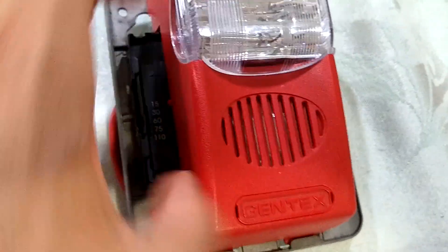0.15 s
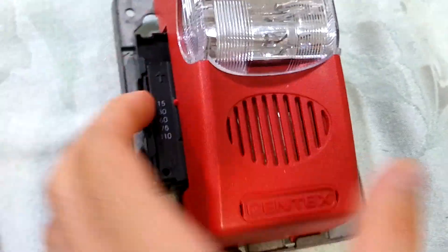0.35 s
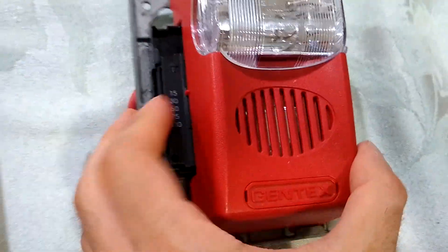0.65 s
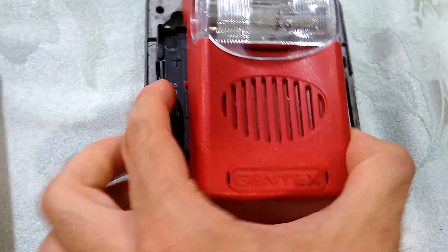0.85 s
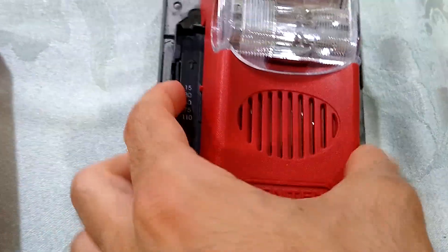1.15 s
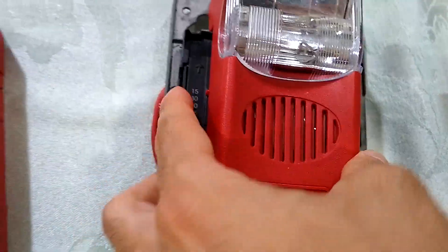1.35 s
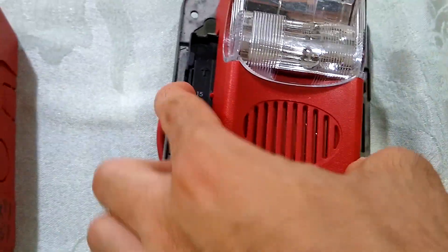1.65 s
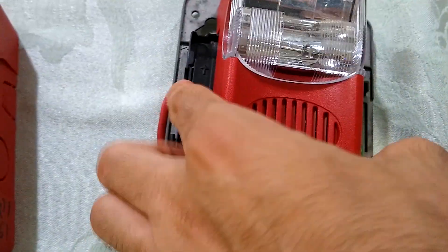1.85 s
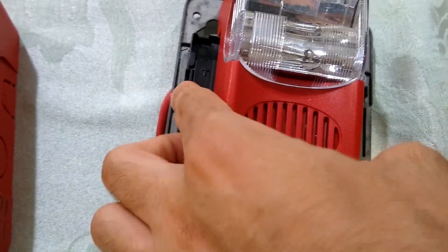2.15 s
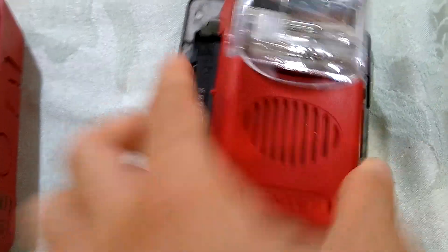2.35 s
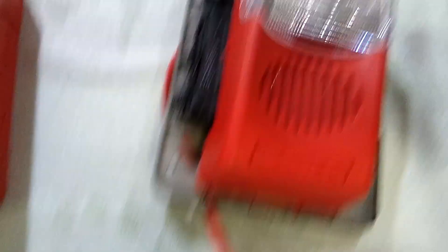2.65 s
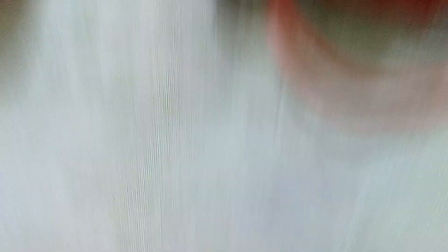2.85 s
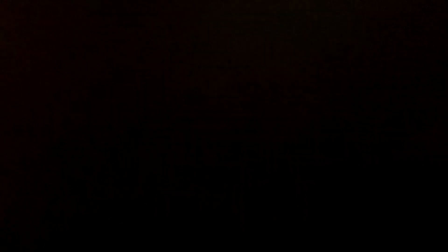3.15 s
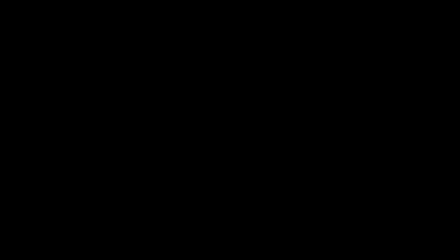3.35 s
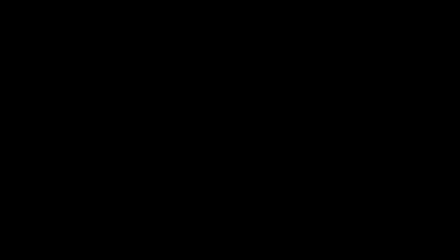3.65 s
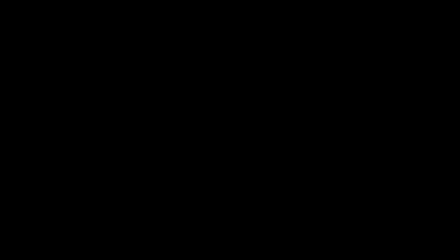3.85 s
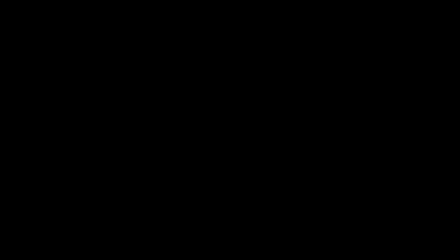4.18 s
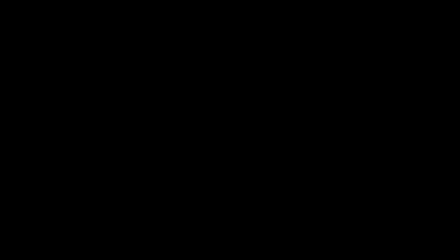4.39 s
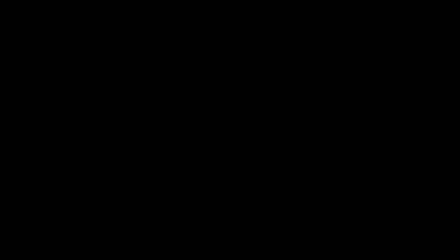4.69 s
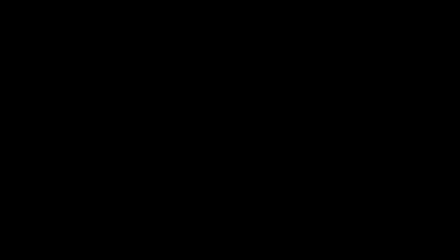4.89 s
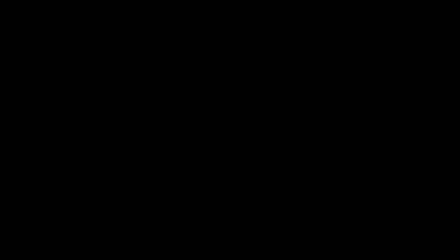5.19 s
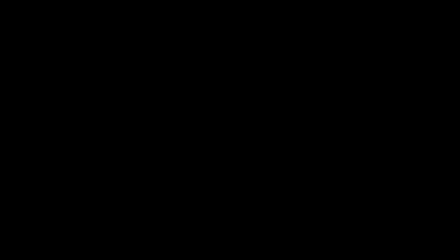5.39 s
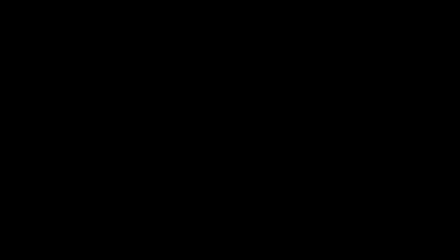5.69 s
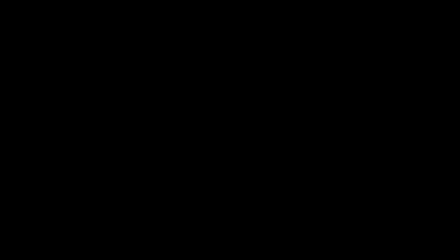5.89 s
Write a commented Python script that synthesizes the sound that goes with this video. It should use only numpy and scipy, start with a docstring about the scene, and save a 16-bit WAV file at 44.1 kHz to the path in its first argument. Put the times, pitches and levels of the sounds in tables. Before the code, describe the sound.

Small plastic clicks and scrapes, then close microphone handling thumps and two loud knocks on a table, with faint clicking continuing.

```python
"""At a table, a hand squeezes and slides a plastic part on a small alarm housing. Catches snap and
surfaces scrape, making the hollow plastic ring. The hand then takes hold of the recorder, whose shell
thumps and rumbles, and lays it on the table with two knocks; the clicking goes on beside it.
A motor hums faintly over the room noise, louder while the recorder's edge presses on the table."""
import sys
import numpy as np
from scipy import signal
from scipy.fft import rfft, irfft, next_fast_len
from scipy.io import wavfile

SR = 44100
rng = np.random.default_rng(int(sys.argv[2]) if len(sys.argv) > 2 else 0)


def dump_mix(stems):
    """Bounce the given channels to the path in sys.argv[1] as a 16-bit WAV at rate SR."""
    frames = np.atleast_2d(stems).T  # one column per channel
    limited = np.clip(frames, -1, 1)  # hard clip at full scale
    pcm = np.round(limited * 32767).astype(np.int16)
    wavfile.write(sys.argv[1], SR, pcm)


N = 265834
TIME = np.arange(N) / SR
TURNED_OVER_S, ON_TABLE_S = 2.7, 3.59   # the recorder is turned over, and later lies still
PRESS_FROM_S, PRESS_TO_S = 3.26, 3.37   # its edge presses on the table

# Plastic catches snapping. Each row: time in seconds, level of the ring range in dB,
# then the edge range (before a small trim) and the treble range in dB against the ring.
CLICKS = [(0.0145, -61, -17, -32), (0.053, -53.5, -17.5, -23.5), (0.5312, -60, -22, -32),
          (0.6346, -66, -22, -25), (0.8304, -54, -26, -25), (0.8573, -60, -15, -28),
          (0.9235, -57, -13, -11.5), (1.133, -47, -12, -15.5), (1.1708, -51.5, -23, -39),
          (1.2904, -54.5, -21, -21), (1.8148, -56, -22, -36), (1.9408, -48, -15.5, -19.5),
          (1.9844, -38.5, -22, -23.5), (2.3064, -52.5, -23, -25), (2.4785, -30.5, -28, -32),
          (2.495, -33.5, -19, -27), (2.8142, -41, -5.5, -13.5), (2.8532, -40, 1.5, 2), (2.9294, -62, 5, -4),
          (3.0668, -62.5, 10, -0.5), (3.7435, -52.5, -14, -26), (3.8212, -48.5, 0, -19),
          (3.8812, -39.5, -12.5, -45), (4.0555, -51, -27, -44), (4.176, -56.5, -8, -13.5),
          (4.634, -27.5, -8, -16), (4.643, -46, -10, -28.5), (4.4834, -58, -10.5, -25),
          (4.7637, -59, -11.5, -24), (4.8425, -60.5, -11, -11.5), (5.264, -64.5, -18, -24),
          (5.4137, -48, -1, -7.5), (5.673, -58.5, -11.5, -15), (5.8354, -55.5, -17.5, -22.5),
          (6.0005, -41, -23, -37), (6.0215, -39.5, 0, -9)]
# Plastic sliding. Each row: time of hardest pressure in seconds, length in seconds, level in dB,
# extra brightness in dB.
SCRAPES = [(0.218, 0.086, -59, -0.5), (0.92, 0.091, -63.5, 2.5), (1.32, 0.036, -55.5, -0.5),
           (1.983, 0.03, -41.5, -0.5), (2.413, 0.074, -49, 1.5), (2.501, 0.05, -38.5, 1.5),
           (2.812, 0.049, -49, 10), (2.841, 0.033, -47.5, 19), (3.232, .022, -48, 12.5),
           (3.321, 0.14, -59, 9), (3.372, 0.043, -40, 7.5), (3.402, .03, -46.5, 24),
           (3.758, 0.048, -53.5, -1.5), (3.881, 0.016, -47, -23), (4.058, 0.099, -61.5, -17),
           (4.986, .05, -60, 6.5), (5.138, 0.075, -64.5, -0.5), (5.58, 0.085, -61.5, 1.5),
           (6.02, 0.074, -44, -3)]
# Spells of restless fingers. Each row: start in seconds, end in seconds, base level in dB.
FIDGETS = [(0.797, 1.306, -67), (3.947, 4.582, -68.5), (4.65, 5.95, -77)]
# The tones the housing rings at. Each row: pitch in Hz, width in Hz, level in dB while it is
# left of the recorder, level in dB while it is on the right.
HOUSING_TONES = [(268, 89, -10.5, 5), (505, 110, -19, -0.5), (596, 100, -0.5, 0.5), (752, 88, 2.5, -1.5),
                 (860, 84, 5, -2.5), (1030, 150, 2, 2), (1190, 150, 0.5, 3), (1450, 280, -6, -1.5),
                 (1920, 520, -12.5, -11.5), (2984, 420, -12, -9.5), (3670, 860, -19.5, -16.5),
                 (5680, 1500, -14, -12), (8000, 3540, -30, -19), (9660, 1400, -24, -27.5),
                 (11640, 1100, -33, -29.5), (14200, 730, -19, -19.5)]
# The housing's sound has four ranges, low to high: body, ring, edge, treble. Their borders in Hz.
RANGE_BORDERS_HZ = [550, 1900, 4600]
# The recorder hitting the table. Each row: time in seconds, base level in dB,
# hardness in Hz (higher is brighter), seconds by which the rim touches first.
LANDINGS = [(3.2404, -3.5, 968, .0085), (3.4164, -5.5, 494, 0.00447)]
# Fingers bumping the recorder. Each row: time in seconds, base level in dB, hardness in Hz.
KNOCKS = [(0.111, -30.5, 123), (0.354, -38, 150), (1.104, -31.5, 188), (1.137, -34, 217), (1.988, -31, 346),
          (2.315, -17, 110), (2.3323, -24, 520), (2.35, -18, 258), (2.381, -20.5, 259), (2.404, -8, 240),
          (2.459, -15.5, 127), (2.476, -15.5, 386), (2.595, -17.5, 242), (2.709, -28, 332),
          (2.78, -26.5, 520), (2.794, -15.5, 263), (2.805, -15, 239), (2.854, -23, 500), (2.931, -30, 464),
          (3.368, -15.5, 130), (3.743, -28.5, 506), (4.64, -26, 288), (6.005, -36.5, 347)]
# Skin dragging on the recorder. Each row: time of hardest pressure in seconds, length in seconds,
# level in dB.
DRAGS = [(0.651, 0.12, -50.5), (1.141, .08, -39), (2.349, 0.046, -31.5), (2.482, 0.14, -29),
         (2.794, 0.063, -22), (3.451, 0.014, -36), (3.512, 0.13, -47.5), (4.088, .09, -52.5),
         (4.491, 0.065, -49.5)]
# The tones of the recorder's shell. Each row: base pitch in Hz, base width in Hz, level in dB.
SHELL_TONES = [(83, 34, 16.5), (150, 23.3, 3), (277.8, 29, -25.5), (486, 210, -17.5), (895, 680, -12)]
# The room's steady noise. Each row: frequency in Hz, relative level in dB.
ROOM_NOISE = [(30, -29), (60, 3.5), (100, 7.5), (250, -1.5), (400, -16.5), (700, -19), (1200, -23),
              (2000, -30), (3100, -34), (4400, -42), (12000, -49)]
# What the table top adds to that noise. Each row: frequency in Hz, relative level in dB.
TABLE_NOISE = [(100, -14), (250, 2), (450, -6.5), (800, -21), (1300, -31), (2000, -18.5), (5500, -35.5),
               (9000, -49)]
# Faint steady hiss, separate in each channel, falling away steeply above 12 kHz.
# Each row: frequency in Hz, relative level in dB.
FAINT_HISS = [(500, 1), (3000, 1), (4400, 0), (12300, -3), (13500, -20), (15000, -30)]
# Treble dips of the ports (the microphone openings). Each row: frequency in Hz, narrowness as Q.
PORT_DIPS = [(4400, 28), (6700, 26)]


def clicks(edge_trim_db=-1.5):
    """The sliding part and its catches snap."""
    out = np.zeros((2, N))
    for s, db, edge_db, treble_db in CLICKS:
        add(out, *click(s, db, edge_db + edge_trim_db, treble_db))
    return out


def click(s, db, edge_db, treble_db, body_db=-12.0, creep_s=0.0024, chatter_s=0.0065):
    """A catch creeps, lets go in one sharp step, then chatters. Returns start and sound."""
    lead = SR // 200
    t = TIME[:SR // 10] - lead / SR
    contact = np.exp(-np.abs(np.where(t < 0, t / creep_s, t / chatter_s)))
    # the brightest, hardest snaps chatter least
    chatter_db = -20 - 0.29 * (treble_db + 19) - 0.22 * max(db + 60.5, 0)
    force = from_db(chatter_db) * rng.standard_normal(len(t)) * contact
    force[lead] += 1   # the catch lets go
    gains = from_db([body_db, 0, edge_db, treble_db])
    sound = sum(gain * unit_energy(part) for gain, part in zip(gains, housing(force, s)))
    return s + t[0], from_db(db) * place(sound, s)


def scrapes():
    """Plastic and fingers slide on the housing and set it ringing."""
    out = np.zeros((2, N))
    for s, length, db, bright_db in SCRAPES:
        t, pressure, force = slips(length, per_s=2200, spread_db=4.5)
        add(out, s + t[0], from_db(db) * place(pressure * rub(force, s, bright_db), s))
    return out


def fidgets(unsteady_db=4.5, unsteady_hz=12.4, ticks_per_s=5):
    """Restless fingers rub the housing with unsteady pressure and make it tick now and then."""
    out = np.zeros((2, N))
    for start, end, db in FIDGETS:
        force = grains(int((end - start) * SR), per_s=1400, spread_db=4.0)
        wobble = rms_one(cut(rng.standard_normal(len(force)), unsteady_hz, "low"))
        pressure = signal.windows.tukey(len(force), .4) * from_db(unsteady_db * wobble)
        add(out, start, from_db(db) * place(pressure * rub(force, start, bright_db=-6.0), start))
        for s in rng.uniform(start, end, int(ticks_per_s * (end - start))):
            tick_db = db + 8.5 + 3.5 * rng.standard_normal()
            add(out, *click(s, tick_db, edge_db=-28.0, treble_db=-34.0))
    return out


def rub(force, s, bright_db, body_db=-5.5, edge_db=-6.0, treble_db=-11.5):
    """The housing rings under a run of tiny slips, spread over many contact points."""
    ranges = housing(force, s, scatter_db=1.5, crack_db=-24.5)
    gains = from_db([body_db, 0, edge_db + bright_db, treble_db + bright_db])
    return rms_one(gains @ ranges)


def housing(force, s, scatter_db=2.0, detune=0.027, crack_db=-23.5):
    """The plastic rings, each contact point in its own way. Returns the four ranges apart."""
    ranges = np.zeros((4, len(force)))
    for k, (hz, width, left_db, right_db) in enumerate(HOUSING_TONES):
        db = (left_db if s < TURNED_OVER_S else right_db) + scatter_db * rng.standard_normal()
        tone = resonate(force, hz * (1 + detune * rng.standard_normal()), width)
        ranges[np.searchsorted(RANGE_BORDERS_HZ, hz)] += (-1) ** k * from_db(db) * tone
    ranges[1] = cut(cut(ranges[1], 470, "high"), 1300, "low")
    ranges[3] = cut(ranges[3] + from_db(crack_db) * force, 4202, "high")   # the contact itself cracks
    return ranges


def place(x, s, glance_db=-7.0, glance_s=0.0019, glance_hz=2500):
    """The housing is on the left until the recorder is turned over; treble glances off the hand."""
    side, pan_db = (1, 0.65) if s < TURNED_OVER_S else (-1, 0.08)
    t = TIME[:SR // 100]
    paths = rng.standard_normal((2, len(t))) * np.exp(-t / glance_s)
    glances = reflect(cut(x, glance_hz, "high"), paths)
    direct = ports(x, side * rng.uniform(.85, 1.15))
    return (direct + from_db(glance_db) * glances) * from_db([[pan_db], [-pan_db]])


def landings(boost_db=1.5, rock_s=.006, rock_slowing=1.7, settle_db_per_s=520):
    """The recorder's rim touches, its shell clacks down, then it rocks ever more slowly and weakly."""
    out = np.zeros(N)
    for s, base_db, hardness_hz, lead_s in LANDINGS:
        db = base_db + boost_db
        add(out, s - lead_s, thump(db + 1, hardness_hz=230))
        clack = thump(db - 9.5, 1.55 * hardness_hz)
        add(out, s, thump(db, hardness_hz) + clack)
        for after_s in rock_s * np.arange(1, 5) ** rock_slowing:
            add(out, s + after_s, thump(db - settle_db_per_s * after_s, hardness_hz=260))
    return out


def knocks(boost_db=2.0, skid_db=-14.5, skid_after_s=0.0072, skid_s=.03):
    """Each finger thumps the recorder's shell, then skids a little."""
    out = np.zeros(N)
    for s, db, hardness_hz in KNOCKS:
        add(out, s, thump(db + boost_db, hardness_hz))
        add(out, *drag(s + skid_after_s, skid_s, db + skid_db))
    return out


def thump(peak_db, hardness_hz, octave_up_hz=520, crack_db=-54.5, crack_s=0.0077):
    """One blow on the shell: a soft one is dull, a hard one stiffens the shell and rings higher."""
    t = TIME[:SR // 6]
    pitch = min(1 + (hardness_hz / octave_up_hz) ** 2, 20)
    blow = (t == 0) * 1.0
    crack = from_db(crack_db) * rng.standard_normal(len(t)) * np.exp(-t / crack_s)
    sound = cut(shell(blow, pitch) + crack, hardness_hz, "low")
    sound = cut(sound, 1.2 * hardness_hz, "low", order=1)
    return from_db(peak_db) * sound / np.abs(sound).max()


def drags():
    """The hand shifts its grip on the recorder."""
    out = np.zeros(N)
    for s, length, db in DRAGS:
        add(out, *drag(s, length, db))
    return out


def drag(s, length, db, skin_hz=420):
    """Skin judders over the shell as a low rumble. Returns start and sound."""
    t, pressure, force = slips(length, per_s=650, spread_db=1.5)
    rumble = rms_one(cut(shell(force, pitch=0.91), skin_hz, "low"))
    return s + t[0], from_db(db) * pressure * rumble


def shell(force, pitch):
    """The recorder's shell answers a push with a few low tones that die quickly."""
    tones = sum(from_db(db) * resonate(force, hz * pitch, width * pitch) for hz, width, db in SHELL_TONES)
    return cut(tones, 30, "high")


def slips(length, per_s, spread_db, rise_share=.45):
    """Surfaces stick and slip. Returns time around the hardest push, the pressure and the slips."""
    rise_s = length * rise_share
    t = TIME[:SR] - .5
    pressure = np.exp(-np.where(t < 0, t / rise_s, t / (length - rise_s)) ** 2)
    touching = pressure > 1e-3
    return t[touching], pressure[touching], grains(SR, per_s, spread_db)[touching]


def grains(count, per_s, spread_db):
    """Tiny slips of uneven size at random moments."""
    sizes = from_db(spread_db * np.minimum(rng.exponential(1, count), 3))
    signs = rng.choice([-1, 1], count)
    return sizes * signs * (rng.random(count) < per_s / SR)


def motor_hum(air_db=-56.5, air_hz=239.5, table_db=-29.0, table_hz=237.0, waver=.45):
    """A motor's hum wavers in the air; the table carries a steadier one while the recorder presses."""
    flutter = resonate(rng.standard_normal(N), air_hz, width=22.18)
    flutter = rms_one(resonate(flutter, air_hz, width=22.18))
    wavering = rms_one(np.sin(2 * np.pi * air_hz * TIME) + waver * flutter)
    overtone = rms_one(resonate(rng.standard_normal(N), hz=451.0, width=6.3))
    in_air = wavering + from_db(-15.5) * overtone * (TIME > TURNED_OVER_S)
    # swells by 1000 dB a second before the press, fades by 150 dB a second after it
    loose_db = 1000 * np.maximum(PRESS_FROM_S - TIME, 0) + 150 * np.maximum(TIME - PRESS_TO_S, 0)
    in_table = np.sqrt(2) * np.sin(2 * np.pi * table_hz * TIME)
    return from_db(air_db) * in_air + from_db(table_db - loose_db) * in_table


def room_echo(x, fade_s=0.18, wall_hz=4000, level_db=-25.5):
    """The walls send back a short, dull wash of echoes from both sides."""
    t = TIME[:SR // 2]
    fade = from_db(-60 * t / fade_s) * (t > .002)
    tails = cut(rng.standard_normal((2, len(t))), wall_hz, "low", order=1) * fade
    left, right = reflect(x, tails)
    return from_db(level_db) * (ports(left, 1.0) + ports(right, -1.32))


def room_noise(level_db=-61.5, table_db=-69.5, hiss_db=-86.0, settle_s=.25):
    """Noise comes from both sides, with more middle range near the table, over a faint steady hiss."""
    near_table = from_db(table_db) * np.clip((TIME - ON_TABLE_S) / settle_s, 0, 1)
    out = np.zeros((2, N))
    for side in (1, -1):
        noise = from_db(level_db) * shaped_noise(ROOM_NOISE) + near_table * shaped_noise(TABLE_NOISE)
        out += ports(noise, side)
    return out + from_db(hiss_db) * np.array([shaped_noise(FAINT_HISS), shaped_noise(FAINT_HISS)])


def ports(x, bearing, lag_samples=20):
    """Two ports, one with its wave flipped; sound from the left (bearing 1) reaches the right later."""
    late = np.pad(x, (int(abs(bearing) * lag_samples + .5), 0))[:len(x)]
    return np.array([x, -late] if bearing > 0 else [late, -x])


def reflect(x, paths):
    """Smear a sound through each pattern of echoes."""
    return np.array([signal.fftconvolve(x, path / np.linalg.norm(path))[:len(x)] for path in paths])


def resonate(x, hz, width):
    """Ring at one pitch; a narrower width rings longer."""
    r = np.exp(-np.pi * width / SR)
    feedback = [1, -2 * r * np.cos(2 * np.pi * hz / SR), r * r]
    return signal.lfilter(np.array([1, 0, -1]) * (1 - r * r) / 2, feedback, x + 1e-18)


def cut(x, hz, kind, order=2):
    """Keep the "low" or the "high" side of a frequency."""
    sections = signal.butter(order, np.clip(hz, 10, .45 * SR), kind, fs=SR, output="sos")
    return signal.sosfilt(sections, x + 1e-18)


def shaped_noise(spectrum):
    """Steady noise whose lows and highs follow a table."""
    hz, db = np.transpose(spectrum)
    size = next_fast_len(N, real=True)
    bins = np.maximum(np.fft.rfftfreq(size, 1 / SR), 1)
    gains = from_db(np.interp(np.log(bins), np.log(hz), db))
    return rms_one(irfft(rfft(rng.standard_normal(size)) * gains, size)[:N])


def from_db(db):
    """Turn decibels into a multiplier."""
    return 10 ** (np.asarray(db) / 20)


def rms_one(x):
    """Scale to an average strength (rms) of 1."""
    return x / np.sqrt(np.mean(x ** 2) + 1e-20)


def unit_energy(x):
    """Scale to the energy of 10 ms at strength 1."""
    return rms_one(x) * np.sqrt(SR / 100 / len(x))


def add(track, s, sound):
    """Mix a sound into a track from second s on."""
    start = int(np.clip(round(s * SR), 0, N - 1))
    track[..., start:start + sound.shape[-1]] += sound[..., :N - start]


def scene(shell_pan_db=-0.28):
    """The plastic is heard through the air, the handling through the recorder's own shell."""
    background = room_noise()
    handling = ports(motor_hum() + landings() + knocks() + drags(), bearing=-0.78)
    handling *= from_db([[shell_pan_db], [-shell_pan_db]])
    plastic = clicks() + scrapes() + fidgets()
    return plastic + room_echo(plastic[0]) + handling + background


def record(dry, shared=0.23, shared_below_hz=1200, top_hz=15900):
    """The ports share some bass and notch the treble; the hardest knocks overload; the top is cut."""
    x = dry + shared * cut(dry[::-1], shared_below_hz, "low", order=1)
    for hz, q in PORT_DIPS:
        x = signal.lfilter(*signal.iirnotch(hz, q, fs=SR), x)
    x = x / (1 + x ** 6) ** (1 / 6)   # rounds off the loudest peaks
    return signal.sosfilt(signal.ellip(10, .1, 80, top_hz, fs=SR, output="sos"), x)


dry = scene()
out = record(dry)
dump_mix(out)
```